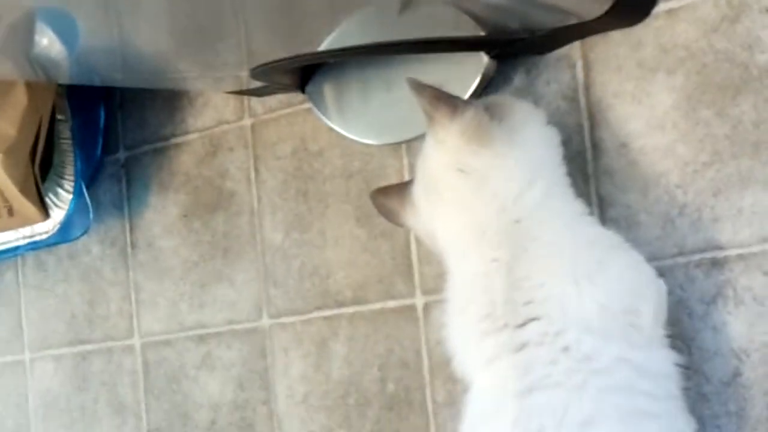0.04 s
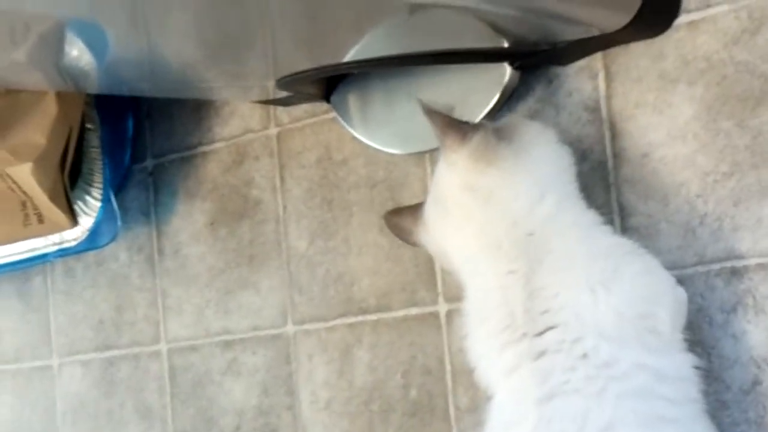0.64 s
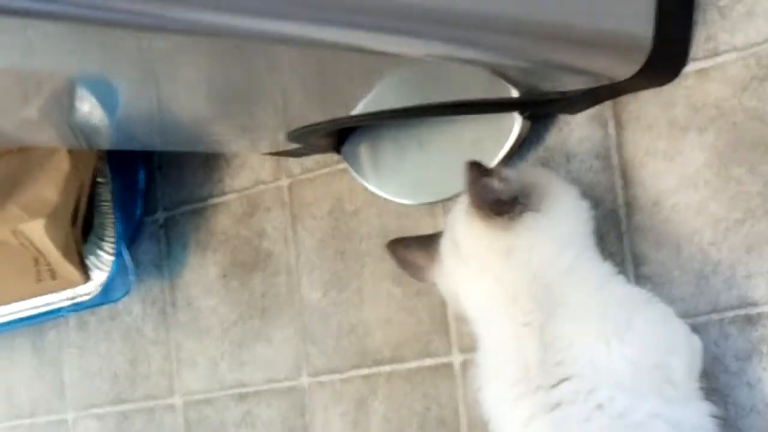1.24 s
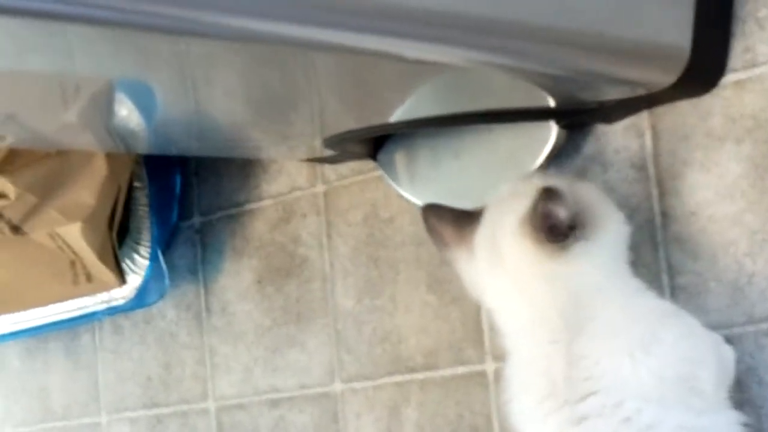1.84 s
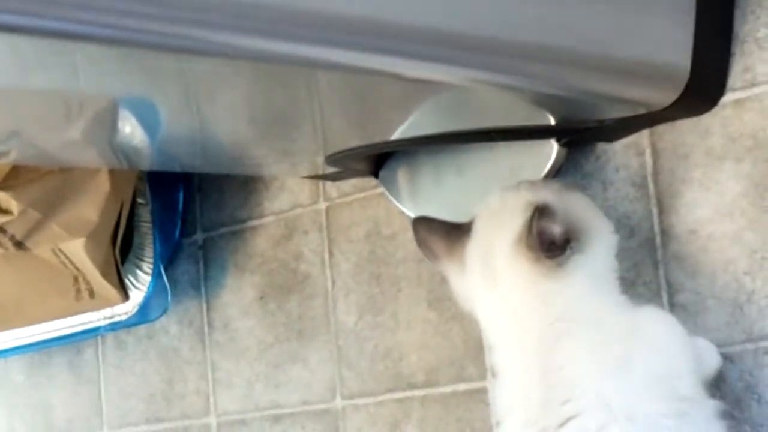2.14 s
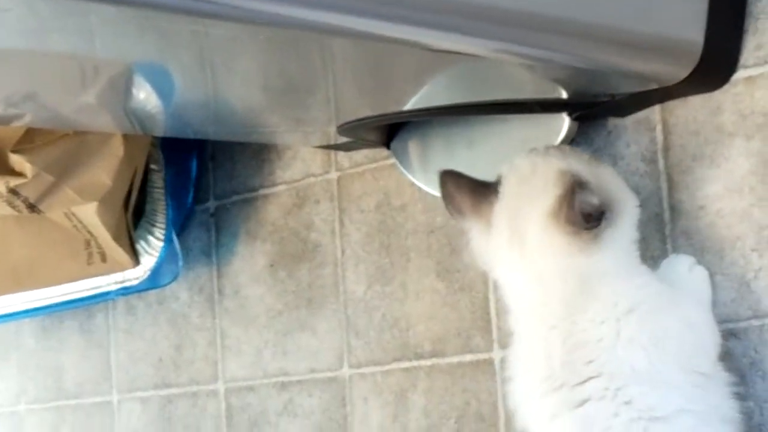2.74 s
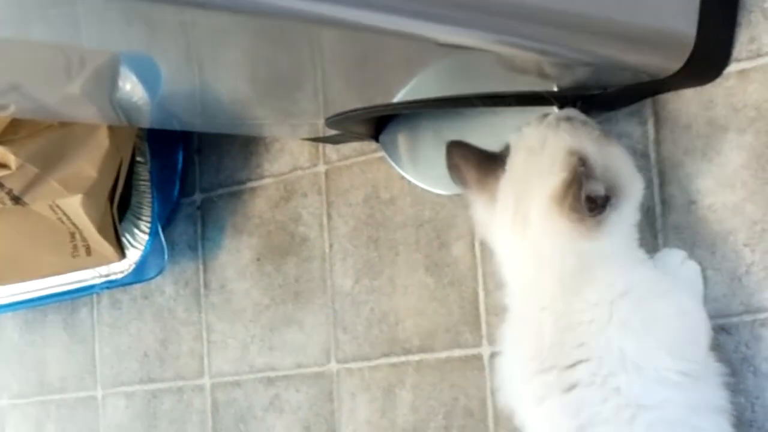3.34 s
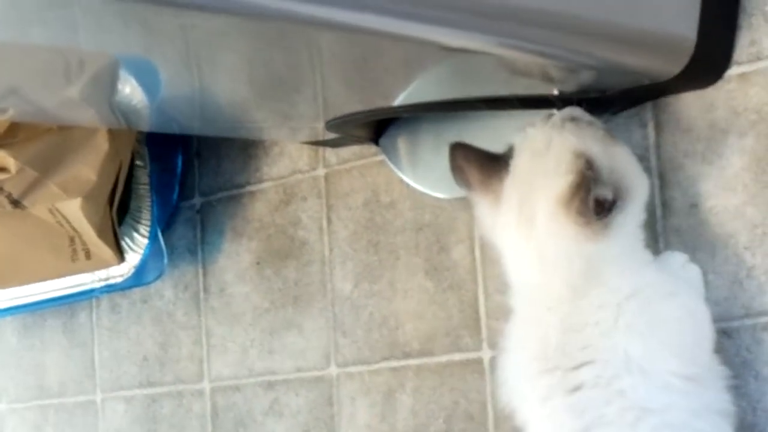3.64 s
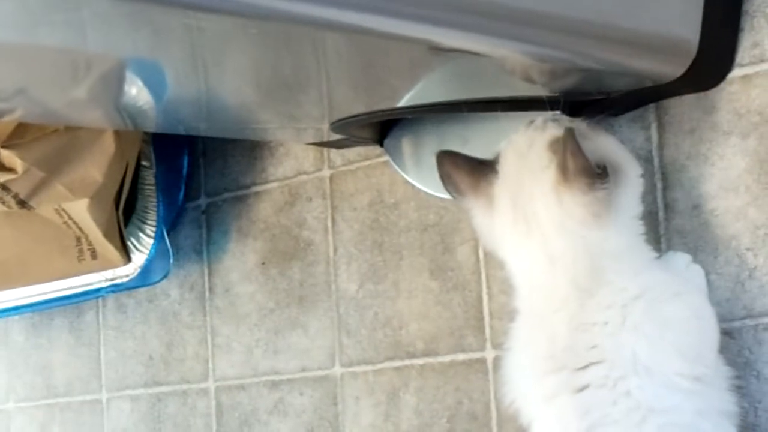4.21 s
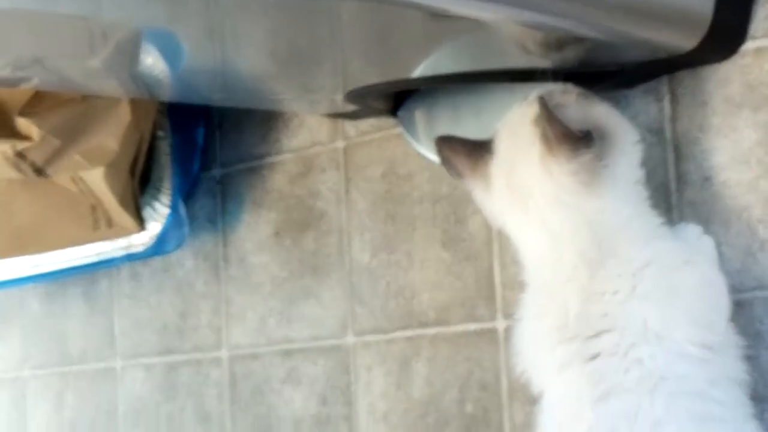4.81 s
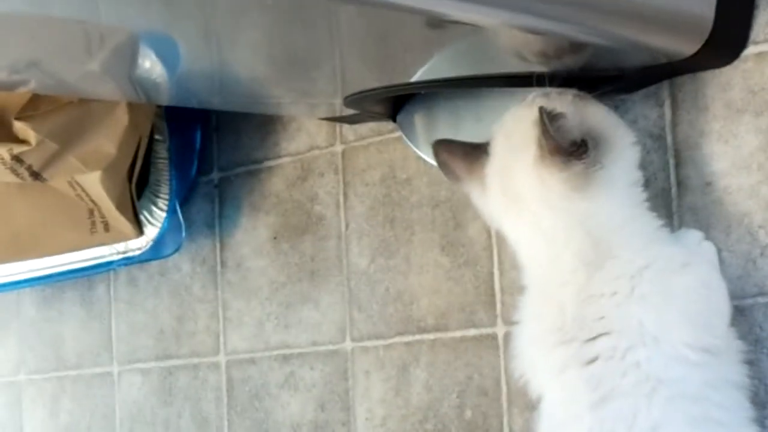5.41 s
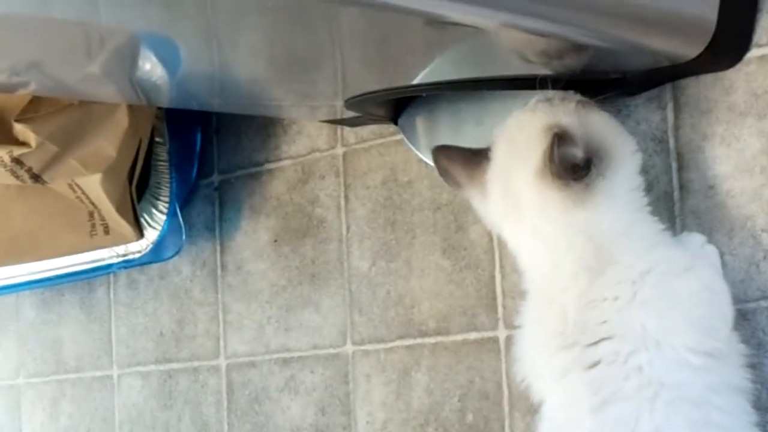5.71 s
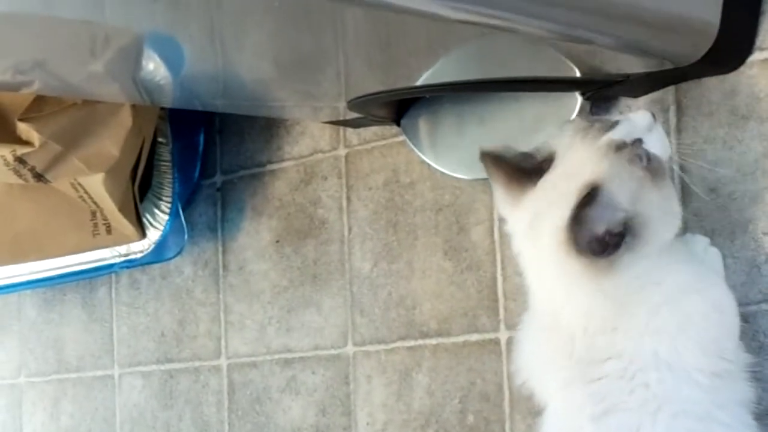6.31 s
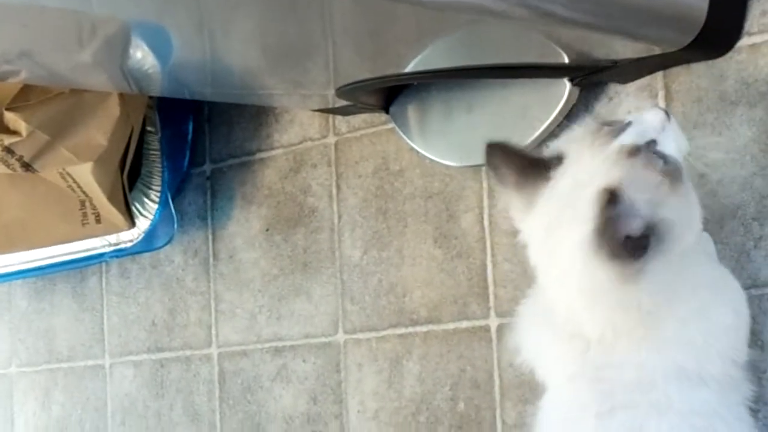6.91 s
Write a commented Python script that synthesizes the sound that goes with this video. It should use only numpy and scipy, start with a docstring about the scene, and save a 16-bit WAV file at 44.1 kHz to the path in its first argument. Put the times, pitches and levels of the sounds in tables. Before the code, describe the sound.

A quiet kitchen is heard throughout the seven seconds: a soft rush of air, from low rumble up to thin hiss, a steady low ventilation fan drone, and a very faint, high electronic whine. Over this, right at the microphone, a camera's focus motor makes tiny dry ticks. Each is a brief, crisp snap with a slight knock and no echo, often doubled in a very quick pair. They start at once, with a loose cluster in the first 0.7 seconds and a faint one around 1 second. More come between 1.8 and 2.8 seconds, with one of the sharpest at 2.8. Scattered ticks follow, clearer around 3.7, 4.1, 5 and 6 seconds, with much fainter ones in between. After about 6 seconds the ticking stops and only the air, drone and whine remain. Everything stays low in level.

```python
"""Tiny dry ticks, often in pairs, right by the microphone: most likely a lens motor stepping its focus.
Each tick is an impact that rings the lens housing and bounces once.
Behind them a quiet kitchen: air rushes, a ventilation fan drones in duct and room resonances,
and electronics whine faintly."""
import sys
import numpy as np
from scipy import signal
from scipy.fft import rfft, irfft, next_fast_len
from scipy.io import wavfile

SR = 44100
rng = np.random.default_rng(int(sys.argv[2]) if len(sys.argv) > 2 else 0)


def put_to_file(sound):
    """Save the sound as 16-bit audio at rate SR, in the file named by the first command-line argument."""
    columns = np.atleast_2d(sound).T  # one column per channel
    safe = np.clip(columns, -1, 1)
    whole_steps = np.round(safe * 32767)
    wavfile.write(sys.argv[1], SR, whole_steps.astype(np.int16))


N = 315367


def from_db(db):
    """Decibels to gain."""
    return 10 ** (np.asarray(db) / 20)


def add(out, start_s, sound):
    """Mix a short sound in at start_s."""
    at = int(np.clip(round(start_s * SR), 0, N))
    out[at:at + len(sound)] += sound[:N - at]


def noise(power_at):
    """Steady noise with power_at(hz) as its power per Hz."""
    size = next_fast_len(N)
    hz = np.maximum(np.arange(size // 2 + 1) * SR / size, 1)
    white = rfft(rng.standard_normal(size))
    return irfft(white * np.sqrt(power_at(hz) * SR / 2), size)[:N]


def ring(push, hz, t60_s):
    """Damped mode: a unit impulse starts a sine of height 1."""
    radius = from_db(-60 / (t60_s * SR))
    step_rad = 2 * np.pi * hz / SR
    return signal.lfilter([0, np.sin(step_rad)], [1, -2 * radius * np.cos(step_rad), radius ** 2], push)


def unit_energy(x):
    """Scale to the energy of 1 ms at rms 1."""
    return x / np.sqrt(np.sum(x ** 2) / (SR / 1000))


def air():
    """Turbulence, from bass draught on the microphone up to thin hiss."""
    # air spectrum: (frequency [Hz], density [dB/Hz])
    spectrum = [(3.0, -50.5), (6.5, -33), (14.0, -46), (40.0, -57.5), (100.0, -58.5), (300.0, -74),
                (620.0, -72.5), (1000.0, -80.5), (2000.0, -84.5), (3300.0, -91.5), (4500.0, -94.5),
                (7000.0, -102.9), (10000.0, -109.1), (14000.0, -111.9)]
    points_hz, density_db = np.transpose(spectrum)
    return noise(lambda hz: from_db(np.interp(np.log(hz), np.log(points_hz), density_db)) ** 2)


def fan_drone():
    """Each resonance picks a narrow band out of the fan's rumble."""
    # duct and room resonances: (centre [Hz], width [Hz], peak density [dB/Hz])
    resonances = [(29.6, 3.2, -48.5), (56, 4.6, -50), (118.2, 11.6, -54.5), (148.4, 11, -67),
                  (170.5, 8.2, -57.5), (200.4, 8, -68), (214.3, 9.1, -53.5), (225.9, 5.3, -55),
                  (239.2, 10.2, -58.5), (273, 10.5, -67.5), (291.5, 9.2, -64), (331, 9.2, -69),
                  (378, 13.8, -64.5), (392.2, 14.3, -62), (425, 7.4, -72.5), (453.3, 15.1, -66.5),
                  (484, 11, -70.5), (504, 13.5, -60), (565, 22, -69.5), (664, 13.4, -76.5),
                  (704.3, 23, -72.5), (835, 17, -72.5), (1367, 9.6, -77)]

    def power_at(hz):
        power = 0
        for centre_hz, width_hz, peak_db in resonances:
            detune = 2 * (hz - centre_hz) / width_hz
            gain = from_db(peak_db) / (1 + (np.sqrt(2) - 1) * detune ** 2)
            power += gain ** 2
        return power
    return noise(power_at)


def electronics_whine(gain_db=-0.7):
    """Close steady sines from the circuits, beating at 30 Hz."""
    # circuit tones: (frequency [Hz], rms level before gain_db [dB])
    tones = [(7822, -84), (7852, -77.5), (7882, -77.5), (7912, -86)]
    t = np.arange(N) / SR
    return sum(np.sqrt(2) * from_db(db + gain_db) * np.sin(2 * np.pi * (hz * t + rng.random()))
               for hz, db in tones)


def housing_tick(knock_db, chatter=0.3, chatter_s=0.00073, spread_db=2.0, split_hz=4500, size=700):
    """An impact and brief chatter ring the housing: low modes knock, high modes snap."""
    # lens housing modes: (frequency [Hz], relative level [dB], t60 [s])
    modes = [(2520, 13.5, 0.0055), (4040, 2.5, 0.0037), (4900, -27, .002), (6260, 5.5, 0.0078),
             (8240, 6.5, 0.0027), (10050, 2.5, 0.0014), (13400, -12, .0018)]
    push = chatter * rng.standard_normal(size) * np.exp(-np.arange(size) / SR / chatter_s)
    push[0] += 1  # impact
    knock, snap = np.zeros(size), np.zeros(size)
    for hz, db, t60_s in modes:
        mode = from_db(db + rng.normal(0, spread_db)) * unit_energy(ring(push, hz, t60_s))
        if hz < split_hz:
            knock += mode
        else:
            snap += mode
    return unit_energy(snap) - from_db(knock_db) * unit_energy(knock)


def focus_hunting(first_s=.075, beat_s=.1, settled_s=6.1, chance=.3, jitter_s=0.0082,
                  snap_db=-57, spread_db=0.7, knock_db=4):
    """Faint ticks on random beats of the focus clock: (time [s], snap [dB], knock re snap [dB])."""
    beats_s = np.arange(first_s, settled_s, beat_s)
    ticking = rng.random(len(beats_s)) < chance
    scatter = rng.standard_normal((len(beats_s), 2))
    return [(time_s + jitter_s * late, snap_db + spread_db * strong, knock_db)
            for time_s, (late, strong) in zip(beats_s[ticking], scatter[ticking])]


def focus_moves(travel_s=.011):
    """The lens ticks as it starts and as it stops: (time [s], snap [dB], knock re snap [dB])."""
    # lens moves: (time [s], relative start snap [dB], relative stop snap [dB], knock re snap [dB])
    moves = [(0.0926, -56, -65, 12), (0.2616, -48, -54, 3), (0.3586, -51, -63, 9), (0.4592, -43.5, -51, 4),
             (0.501, -46, -63, -10), (0.5621, -46.5, -60, 5), (0.663, -43, -40, -7), (1.0599, -51, -63, -3),
             (1.7623, -45, -45, -9), (1.8631, -41.5, -63, 0), (2.162, -45, -51, 3), (2.19, -49, -63, -9),
             (2.2642, -41.5, -60, 0), (2.67, -48.5, -63, -1), (2.7742, -37, -46, -9),
             (3.0776, -50, -63, -9), (3.2693, -55, -63, 8), (3.6668, -55, -40, 1), (3.9648, -48.5, -58, 1),
             (4.0646, -44, -58, 4), (4.4985, -52, -63, -9), (4.6658, -48.5, -63, 0), (4.863, -45, -54, -1),
             (4.9673, -45, -38, -6.5), (5.781, -54, -63, 5), (5.966, -42.5, -40.5, -4)]
    ticks = []
    for time_s, start_db, stop_db, knock_db in moves:
        ticks += [(time_s, start_db, knock_db), (time_s + travel_s, stop_db, knock_db)]
    return ticks


def lens_motor(gain_db=1.5, bounce_s=.0017, full_bounce_db=-37, bounce_db_per_db=1.4):
    """Ticks bounce once, soft ones far less; they travel through the casing and carry no room."""
    out = np.zeros(N)
    for time_s, snap_db, knock_db in focus_moves() + focus_hunting():
        bounce_db = min(0, bounce_db_per_db * (snap_db - full_bounce_db))
        add(out, time_s, from_db(snap_db) * housing_tick(knock_db))
        add(out, time_s + bounce_s, from_db(snap_db + bounce_db) * housing_tick(knock_db))
    return from_db(gain_db) * out


def scene():
    """Air, drone, whine and ticks in mono."""
    return (air() + fan_drone() + electronics_whine() + lens_motor())[None]


def record(dry, cutoff_hz=14250):
    """Steep low-pass."""
    lowpass = signal.firwin(301, cutoff_hz, fs=SR)
    return signal.fftconvolve(dry, lowpass[None], mode="same")


dry = scene()
out = record(dry)
put_to_file(out)
```